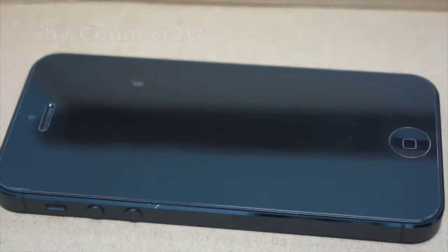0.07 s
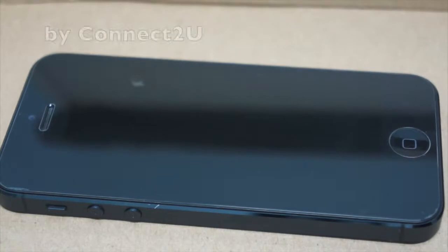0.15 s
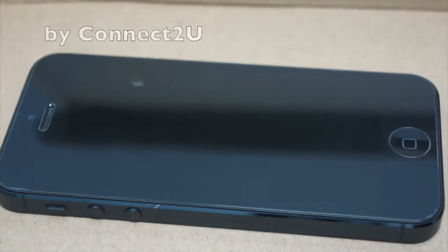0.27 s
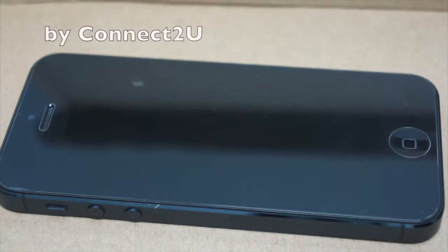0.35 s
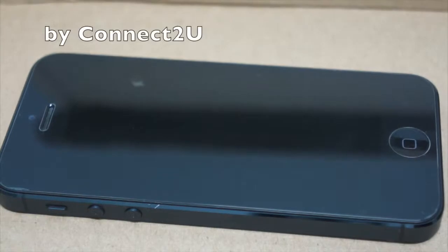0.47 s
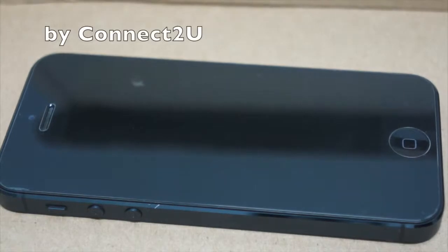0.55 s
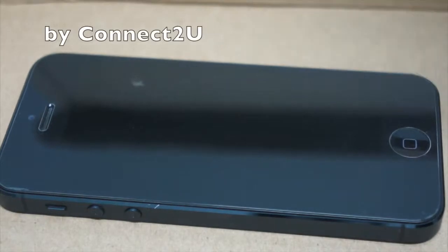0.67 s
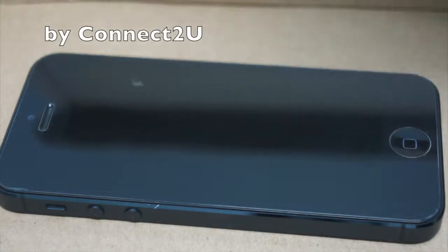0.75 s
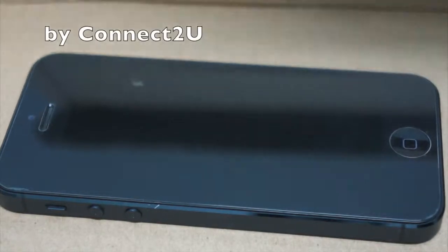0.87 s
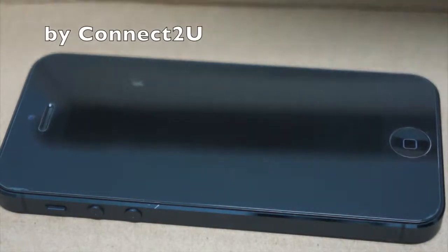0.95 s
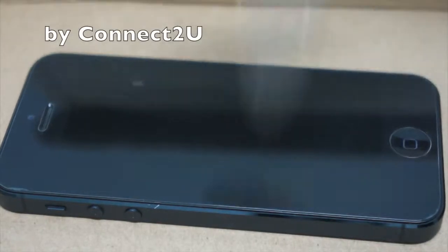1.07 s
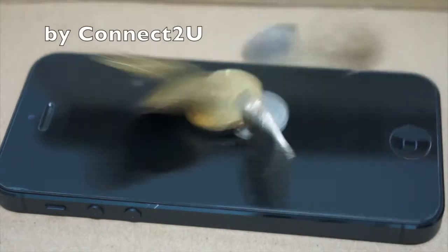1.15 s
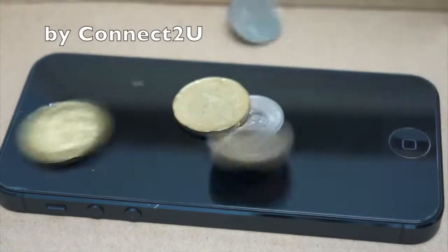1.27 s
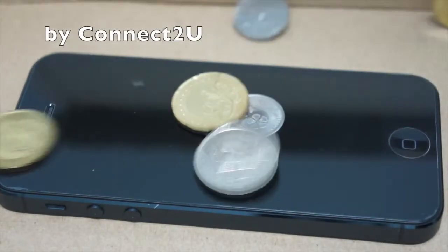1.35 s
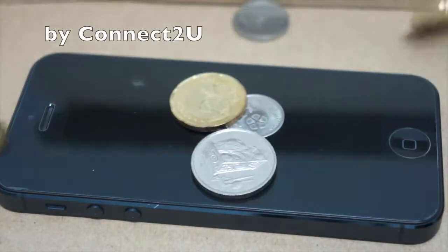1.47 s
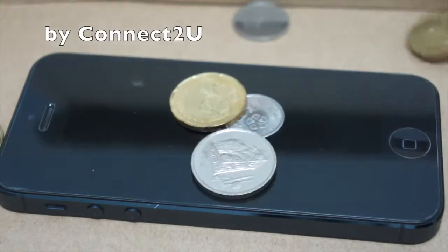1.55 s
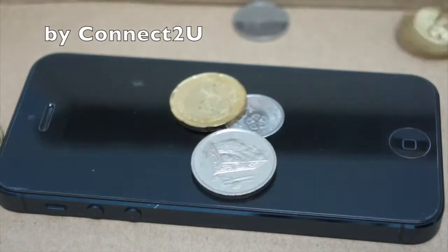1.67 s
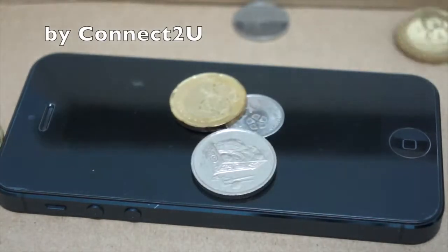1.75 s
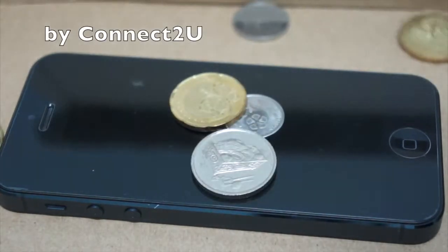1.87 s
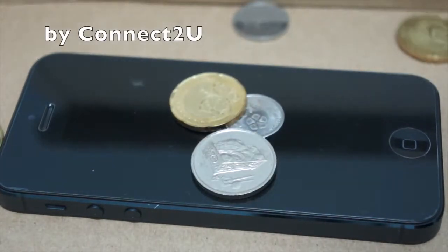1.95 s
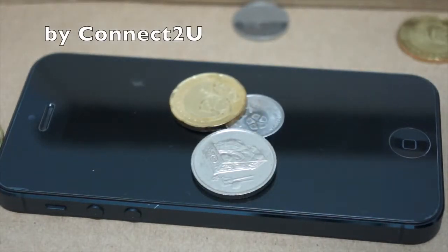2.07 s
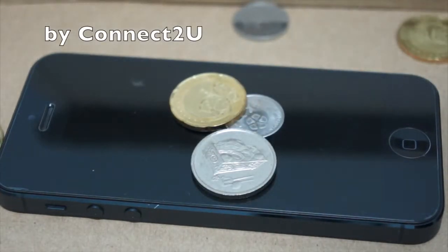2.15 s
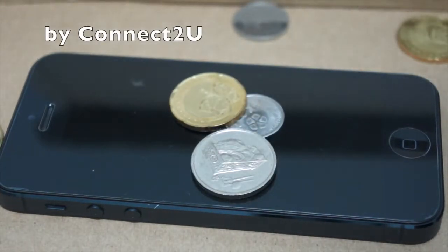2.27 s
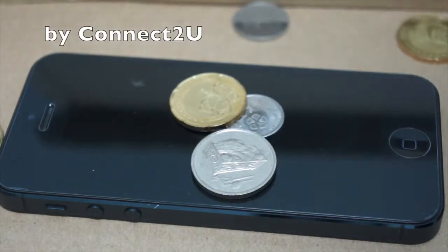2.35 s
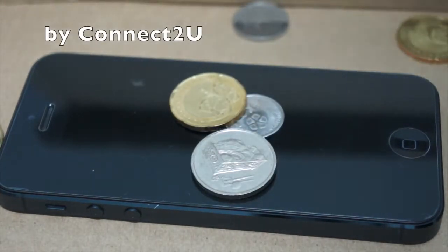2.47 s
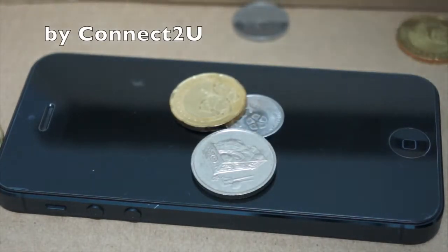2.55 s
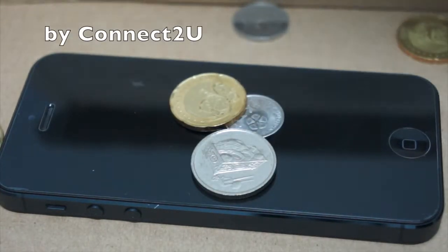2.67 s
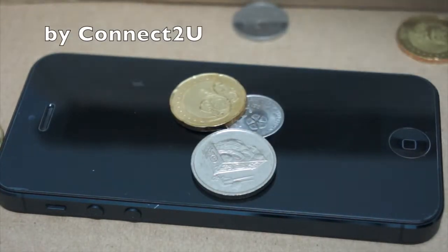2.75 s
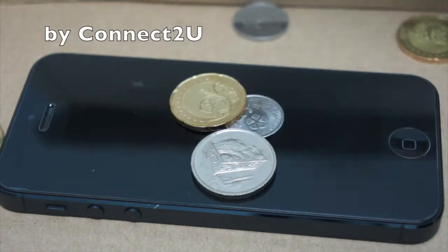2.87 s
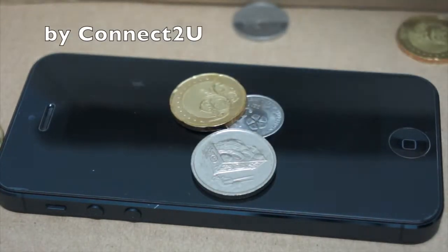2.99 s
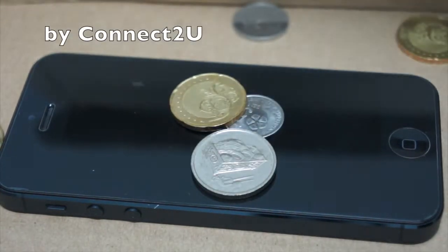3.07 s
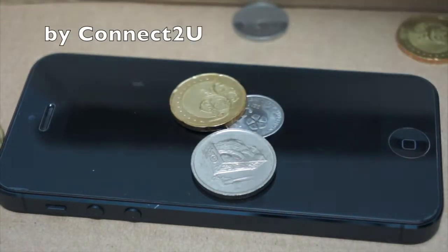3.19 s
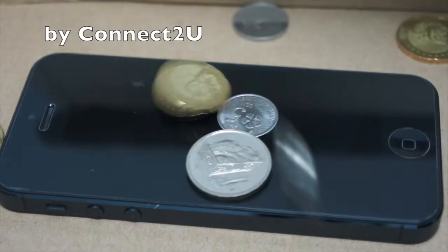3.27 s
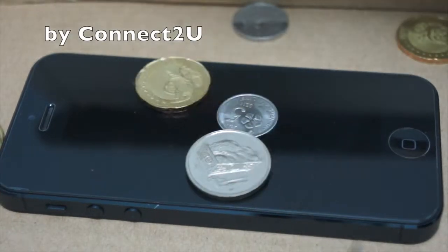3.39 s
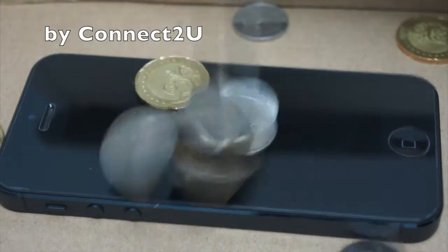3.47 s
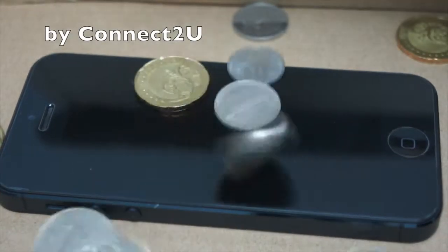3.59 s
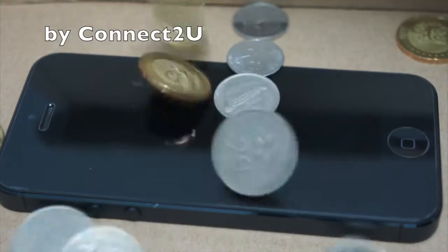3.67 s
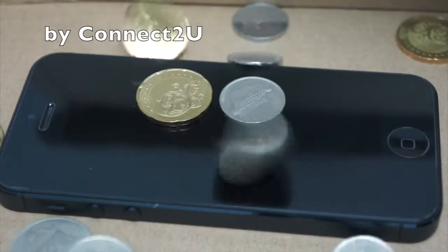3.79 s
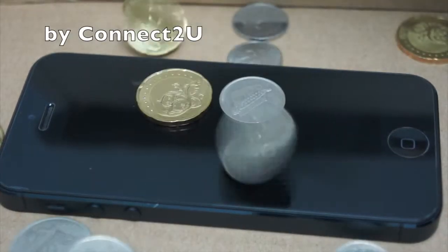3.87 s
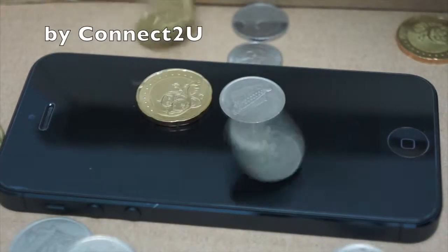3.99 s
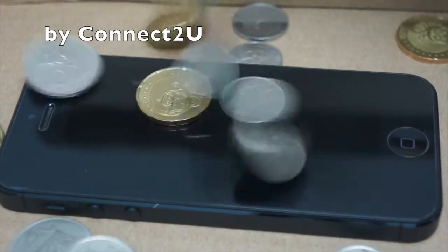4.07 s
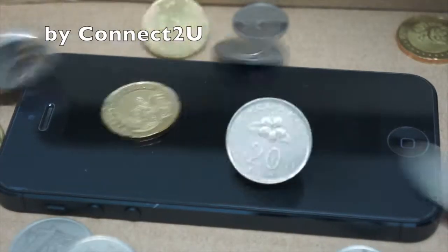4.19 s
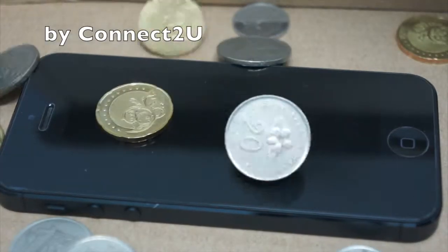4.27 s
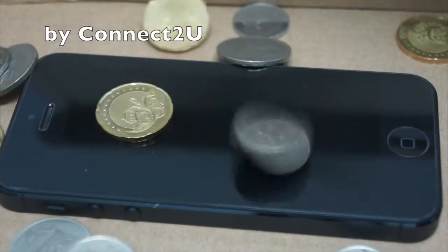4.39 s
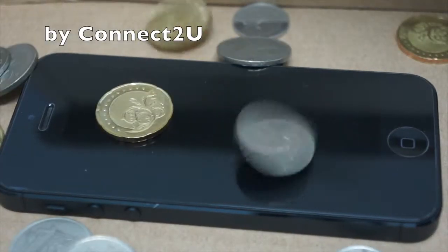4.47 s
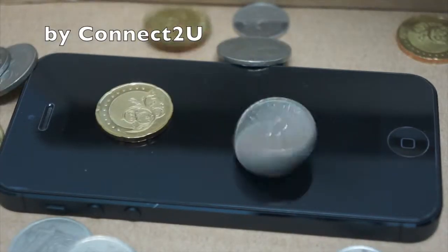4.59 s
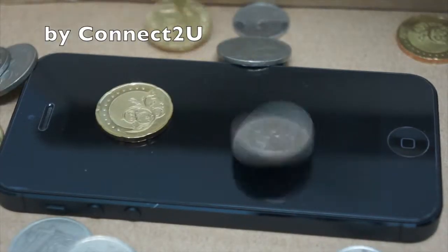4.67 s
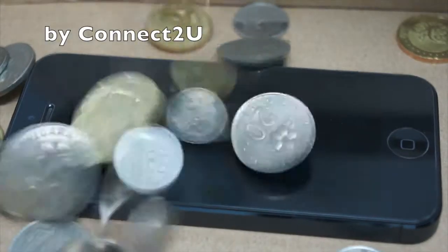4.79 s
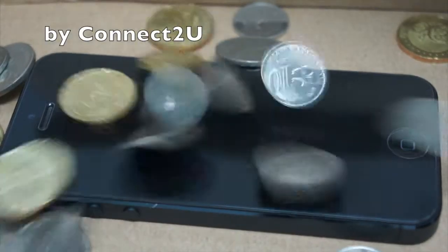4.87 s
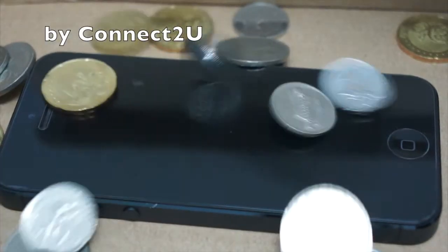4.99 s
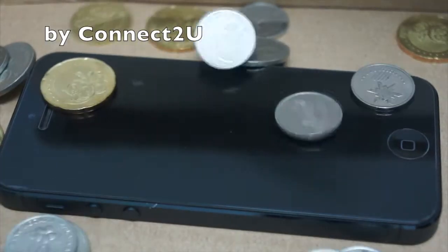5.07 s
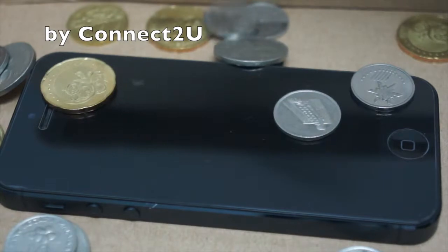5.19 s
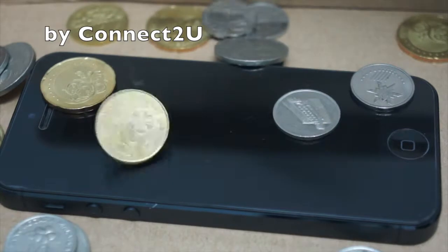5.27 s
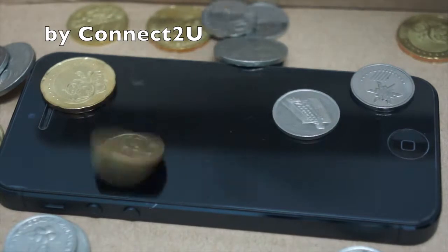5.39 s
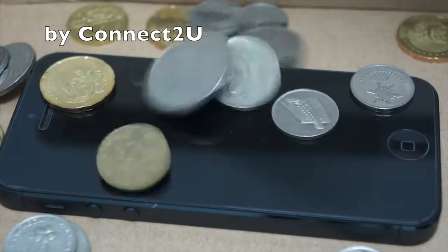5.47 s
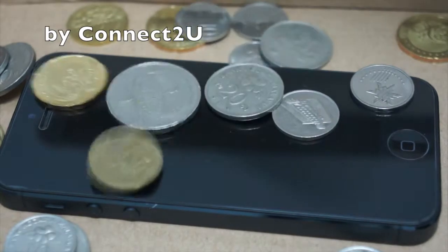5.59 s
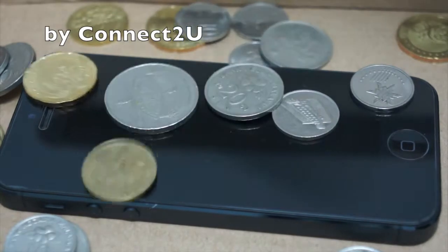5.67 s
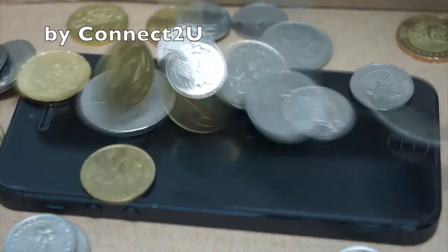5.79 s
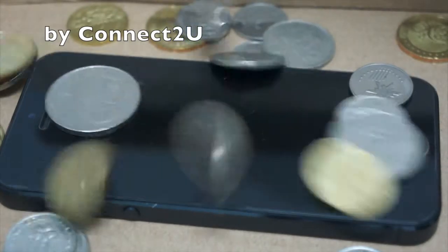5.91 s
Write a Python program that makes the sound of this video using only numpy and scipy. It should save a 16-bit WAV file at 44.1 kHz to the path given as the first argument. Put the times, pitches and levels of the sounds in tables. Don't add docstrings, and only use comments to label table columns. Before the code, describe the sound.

Sparse high clinks of coins shaken in a palm come first, over faint room tone. A dense burst of metal on glass follows, with dull taps from coins landing beside the phone. Sharp palm clinks return and thin out, then a second, longer shower rattles, skitters and rings. Close, bright, slightly limited camera sound with little reverb.

```python
import sys
import numpy as np
from scipy import signal
from scipy.fft import rfft, irfft, next_fast_len
from scipy.io import wavfile
from scipy.ndimage import uniform_filter1d, map_coordinates

SR = 44100
rng = np.random.default_rng(int(sys.argv[2]) if len(sys.argv) > 2 else 0)


def volts_from_db(level):
    exponent = np.asarray(level, float) / 20
    return 10 ** exponent


def unload_audio(sound):
    columns = np.transpose(np.atleast_2d(sound))
    steps = np.round(np.clip(columns, -1, 1) * 32767)
    wavfile.write(sys.argv[1], SR, steps.astype(np.int16))


N = 261954

# (time [s], level [dB])
AIR_LEVEL = [(.11, -45), (.72, -43.5), (.78, -47.5), (2.2, -58), (3.2, -54.5), (5.27, -59), (5.32, -82),
             (5.94, -82)]
# (frequency [Hz], density [dB])
AIR_SPECTRUM = [(25, -19), (100, 13), (300, 6.5), (650, -2), (1500, -8.5), (2200, -7.5), (4500, -19),
                (7000, -19), (10000, -9)]
# (frequency [Hz], gain [dB])
MIC_RESPONSE = [(60, -30.5), (150, -18.5), (400, -2.5), (1400, 3), (3000, 0.5), (5500, 2), (7500, -2),
                (10500, -2)]
# (frequency [Hz], t60 [s])
ROOM_DECAY = [(300, 0.1), (2000, 0.33), (10000, 0.17)]
# (frequency [Hz], likeness [0-1])
PORT_LIKENESS = [(200, 0.94), (700, 0.78), (1500, 0.41), (4000, 0), (9000, 0)]
# (time [s], tick [Hz], knock [Hz])
SLAB_LOAD = [(.11, 4780, 900), (1.13, 4750, 810), (1.16, 2890, 840), (1.57, 2216, 760), (2.05, 2590, 760),
             (2.24, 4710, 1193), (3.2, 4534, 1080), (3.43, 2564, 878), (3.8, 3065, 894), (4.3, 2278, 831),
             (4.65, 3930, 827), (4.85, 3246, 922), (5.15, 2997, 965), (5.7, 4100, 1160)]

COIN_MODE_HZ = [7995, 10793, 9050, 10110, 8829, 10589, 8064, 10995, 8549, 6880, 7337, 9749, 8646, 9189,
                10980, 9860, 8740]
# (time [s], peak level [dB])
FLIGHTS = [
    [(.122, -29), (.14, -37), (.207, -36), (.333, -35), (1.015, -48), (1.055, -60)],
    [(.772, -22), (.965, -31), (1, -44), (1.19, -22), (1.225, -22.5), (1.26, -34), (3.291, -25),
     (3.325, -22), (3.354, -39)],
    [(2.996, -46), (3.03, -50)],
    [(3.32, -18), (3.545, -26), (3.567, -20), (3.59, -16), (3.622, -16), (3.651, -16.5), (3.713, -14.5),
     (3.74, -21), (3.765, -28)],
    [(3.956, -36), (3.978, -40), (4.003, -25), (4.04, -38), (4.075, -35), (4.155, -20), (4.187, -10),
     (4.208, -22), (4.227, -19), (4.25, -29), (5.375, -36), (5.419, -47)],
    [(3.533, -29), (3.553, -17.5), (3.576, -24), (3.637, -22), (3.709, -24), (3.76, -22)],
    [(3.677, -41), (3.74, -29), (3.765, -25)],
    [(3.679, -25), (3.72, -24), (3.759, -24), (3.799, -22), (3.822, -26)],
    [(4.619, -20), (4.646, -26), (4.704, -20), (4.9, -25), (4.925, -33), (4.974, -27)],
    [(4.817, -33), (4.875, -36), (4.97, -38), (5.02, -36), (5.061, -34)],
    [(5.365, -46), (5.39, -35.5), (5.447, -45), (5.481, -30), (5.556, -18), (5.578, -48)],
    [(5.487, -17.5), (5.506, -13.5), (5.522, -21), (5.54, -24), (5.57, -24)],
    [(5.635, -23.5), (5.668, -27), (5.711, -32), (5.74, -35)],
    [(5.612, -24.5), (5.672, -29), (5.711, -29), (5.74, -34)],
    [(5.675, -36), (5.72, -44)],
    [(1.921, -13), (1.958, -13.5), (2.011, -26), (2.039, -17.5), (2.135, -20.5)],
    [(2.024, -24), (2.211, -21), (2.244, -18), (2.29, -19)],
]
# (time [s], frequency [Hz], peak level [dB])
BRIEF_FLASHES = [
    (1.48, 10800, -25.5),
    (1.776, 9300, -20),
    (1.83, 9250, -17),
    (2.251, 10570, -18),
    (2.274, 10500, -17),
    (2.32, 8310, -17.5),
    (.39, 4060, -49),
    (.42, 4020, -44),
    (.58, 2610, -45),
]

# (from [s], to [s])
SETTLING = (2.1, 2.34)
# (frequency [Hz], level [dB])
SETTLING_MODES = [
    (1160, -54),
    (2800, -49),
]

# (from [s], to [s], first level [dB], last level [dB], tick under the clink [dB])
PALM = [(0.09, 0.217, -26.5, -29, -15.5), (0.311, 0.379, -24, -48, -12), (0.386, 0.543, -44, -37.5, -1.5),
        (0.701, 0.74, -37, -20, -14), (0.884, 0.958, -46, -49, -8), (2.12, 2.302, -28.5, -24, -15),
        (2.422, 2.5, -13, -36.5, -20.5), (2.524, 2.6, -37, -48.5, -5.5), (2.599, 2.631, -46, -31, -4),
        (2.645, 2.773, -23, -59.5, -3), (2.756, 3.19, -52.5, -69, 1.5), (3.202, 3.25, -56, -41, 0)]
# (from [s], to [s], first level [dB], last level [dB])
POUR = [(1.141, 1.286, -18.5, -31), (1.324, 1.61, -34, -33.5), (1.588, 1.954, -25, -24),
        (1.908, 2.08, -18, -30.5), (3.267, 3.35, -29, -30), (3.371, 3.46, -20, -38.5),
        (3.5, 3.824, -23.5, -37.5), (3.783, 4.077, -25, -56), (4.107, 4.257, -22, -32.5),
        (4.232, 4.545, -47, -42), (4.549, 4.766, -21, -37), (4.771, 4.988, -25.5, -27),
        (4.97, 5.28, -27, -39), (5.278, 5.455, -30, -49), (5.459, 5.556, -23, -50),
        (5.566, 5.74, -30, -38.5), (5.755, 5.94, -29.5, -26)]
# (from [s], to [s], first level [dB], last level [dB], knock over the tick [dB])
SKITTER = [(1.154, 1.56, -25, -29.5, -1.5), (1.595, 2.012, -36.5, -32.5, 0.5),
           (3.273, 3.467, -28.5, -39, -6.5), (3.513, 3.9, -32, -28, -2.2), (3.91, 4.248, -30, -33.5, -6),
           (4.226, 4.442, -30.5, -35, -2.5), (4.455, 4.742, -34.5, -32.5, -2.5),
           (4.765, 4.928, -29, -35, -4), (4.919, 5.253, -29.5, -43, 0), (5.3, 5.44, -33, -49.5, -12),
           (5.458, 5.514, -27, -38, -6), (5.535, 5.695, -35, -39.5, -8.5), (5.77, 5.94, -35.5, -26.5, -5.5)]
# (from [s], to [s], first level [dB], last level [dB])
ROLL = [
    (1.16, 1.5, -49, -48.5),
    (1.54, 2.08, -47, -57),
    (3.39, 3.47, -42, -48.5),
    (3.5, 3.79, -56.5, -41.5),
    (3.79, 4.08, -41, -69),
    (4.22, 4.5, -52, -64),
    (4.5, 5.29, -66, -69.5),
    (5.46, 5.6, -62, -76),
    (5.76, 5.84, -71, -82),
]

# (centre [Hz], log spread, t60 [s])
CRACK = (6460, 0.421, 0.013)
# (log spread, t60 [s])
THUD = (.28, .06)

# (time [s], peak level [dB], tick level [dB])
PALM_CLINKS = [(0.117, -25, -37), (0.16, -25, -24), (0.1732, -24, -29), (0.186, -21, -34),
               (0.3125, -17.5, -62), (0.4361, -4.5, -25), (0.5696, -11.5, -46), (0.5789, -25, -35),
               (0.7135, -25, -45), (0.7247, -13.5, -48), (0.7444, -12, -45), (0.7642, -14.5, -34),
               (0.909, -22, -52), (0.9238, -21, -47), (0.933, -36, -48), (0.942, -37, -45),
               (0.951, -29, -50), (1.079, -40, -67), (0.9576, -17.5, -60),
               (2.132, -13, -42), (2.209, -10, -30.5), (2.24, -5, -52), (2.27, -24, -52), (2.295, -6, -49),
                (2.3272, -4.5, -29.5), (2.384, -19, -41.5), (2.4307, -17, -27), (2.4759, -12.5, -37),
                (2.5533, -21, -52), (2.6625, -15, -34), (2.7944, -38, -32.5), (2.874, -37, -43),
                (2.975, -37, -49), (2.99, -31, -48), (3.111, -30.5, -43), (3.1922, -33, -44),
               (1.129, -33, -50),
    (3.242, -25, -41),
]
# (time [s], glass tick level [dB],
# slab knock level [dB], coin clink level [dB])
SHOWER_LANDINGS = [(1.1485, -19.5, -35, -23), (1.1592, -25, -37, -22), (1.165, -26, -23, -14),
                   (1.1724, -16, -24, -25), (1.1839, -27, -36, -21), (1.1932, -18, -24, -15),
                   (1.2272, -19.0, -30, -14), (1.2527, -16, -33, -22), (1.2751, -26, -20, -20.5),
                   (1.2822, -26, -19.5, -38), (1.2897, -20, -26, -35), (1.2955, -11.5, -12, -29),
                   (1.3082, -26, -31, -18), (1.3496, -14, -42, -24), (1.3604, -37, -6, -28.0),
                   (1.3653, -14, -24, -27), (1.3766, -17, -25, -11), (1.3872, -37, -40, -35),
                   (1.4059, -43, -37, -12), (1.4165, -20, -14.5, -8.5), (1.4474, -39, -31, -16),
                   (1.4645, -20, -14, -32), (1.4883, -21, -38, -35), (1.4933, -21.5, -35, -31),
                   (1.5102, -31, -8, -18), (1.5239, -12.5, -19, -43), (1.5309, -11, -27, -38),
                   (1.557, -10, -20, -36), (1.5768, -10, -27, -21), (1.6361, -18, -26.5, -18),
                   (1.7313, -46, -40, -24), (1.7699, -54, -32, -24), (1.7988, -20.5, -21, -36),
                   (1.8346, -48, -29, -9), (1.8827, -26, -27, -12.5), (1.9026, -28, -36, -14),
                   (1.9224, -45, -42.5, -14), (1.9301, -60, -56, -9.5), (1.9564, -33, -43, -18),
                   (1.9731, -43, -44, -18), (1.9908, -20.5, -17.5, -38), (2.0108, -45, -32, -20),
                   (2.0194, -35, -25, -34), (2.035, -42, -28, -15), (2.0443, -34, -40, -31),
                   (2.0614, -47, -57, -16),
                   (3.2535, -45, -51, -31), (3.2591, -20, -19, -12.5), (3.2978, -32, -25, -11),
                 (3.322, -52, -30, -11), (3.3322, -18.5, -28, -15.5), (3.347, -38, -37, -24.0),
                 (3.3724, -23, -49, -28), (3.3885, -34, -43, -22), (3.3988, -23, -46, -16),
                 (3.4157, -31, -48, -13), (3.4328, -12, -24, -26), (3.4672, -31, -39.0, -14.5),
                 (3.5019, -16, -16, -12.5), (3.5077, -23, -37, -10), (3.5193, -33, -45, -20.0),
                 (3.5262, -23.5, -45, -16), (3.5644, -22, -40, -23), (3.5796, -28.0, -21.5, -25),
                 (3.5883, -20, -26, -21), (3.5972, -26, -18, -10), (3.6109, -20, -24, -22),
                 (3.6482, -14.5, -20, -27), (3.6753, -15.5, -40, -9), (3.6802, -19, -10.5, -10.5),
                 (3.7087, -34, -27, -24), (3.7262, -42, -35.0, -24), (3.731, -42, -44, -27),
                 (3.7386, -37, -19.5, -15), (3.7513, -27, -35.0, -31.0), (3.7585, -14, -25, -11.5),
                 (3.7945, -11, -17, -35), (3.8032, -12, -15, -21), (3.8188, -12, -45, -17),
                 (3.8273, -21, -16.5, -23), (3.8582, -49, -37, -10.5), (3.9008, -12, -11.5, -22.5),
                 (3.9129, -25, -37, -37), (3.9283, -15, -29, -26), (3.94, -34, -32, -47.0),
                 (4.0429, -29.5, -24.5, -29),
                   (4.088, -14, -30, -9), (4.0942, -24, -24, -6.5), (4.1054, -36, -47.0, -30),
                (4.113, -21, -22, -15), (4.1422, -20, -25, -12), (4.238, -11.5, -23, -24),
                (4.249, -15, -25, -36), (4.2845, -12, -28, -32), (4.2782, -8.5, -16, -20),
                (4.2912, -14, -36, -30), (4.3688, -20, -22, -25.5), (4.4774, -35, -31, -26),
                (4.502, -35, -35, -24), (4.5438, -43, -38.0, -19), (4.5637, -26, -31, -24),
                (4.6048, -35, -31, -10), (4.6126, -35, -45, -6), (4.6677, -45, -35, -27),
                (4.6891, -45, -45, -35), (4.6995, -46, -31, -15), (4.7084, -44, -47, -5.5),
                (4.7743, -14.5, -24.5, -13), (4.783, -16.5, -30, -24), (4.799, -21, -21.5, -19),
                (4.806, -16, -31, -11.5), (4.8272, -29, -23.5, -14), (4.8336, -18, -24, -13),
                (4.8427, -12.5, -27, -15), (4.85, -20, -28.0, -16), (4.8572, -21, -34, -8.5),
                (4.8653, -29, -27, -12), (4.87, -28, -36, -10), (4.891, -34, -40, -15),
                (4.8974, -22, -34, -11),
                   (4.9333, -10, -17.5, -16), (4.9529, -18, -36, -23), (4.959, -18, -26, -31),
              (4.9738, -17, -31, -29), (4.9892, -26, -33, -9.5), (4.997, -44, -30, -20),
              (5.0161, -16.5, -37, -20), (5.0227, -17, -33, -32), (5.0299, -25, -23.5, -33),
              (5.0378, -18, -37, -25), (5.0442, -25, -31, -18), (5.052, -25, -32, -23),
              (5.1072, -19, -26, -17.5), (5.129, -24.5, -23, -19), (5.1383, -22, -36, -31),
              (5.173, -21.5, -40, -39), (5.188, -27, -57, -48), (5.2818, -17, -25, -13),
              (5.2877, -25, -26, -17), (5.4618, -15.5, -22.5, -16), (5.469, -28, -36, -15.0),
              (5.4781, -30, -24, -4.5), (5.5311, -21, -31, -25), (5.548, -44, -49, -18),
              (5.5526, -24.5, -37, -7.5), (5.5661, -39, -33, -25), (5.606, -38, -44, -18),
              (5.7581, -24.5, -22.5, -10), (5.7693, -46, -49, -15), (5.8045, -21.5, -26, -13.5),
              (5.8364, -27, -30, -9), (5.8416, -21.5, -24, -17), (5.8728, -22, -33, -13),
              (5.8805, -19, -30, -22), (5.893, -33, -38, -15), (5.9092, -29, -36, -23)]
# (time [s], peak level [dB], frequency [Hz])
FLAT_LANDINGS = [(1.174, -14.5, 900), (1.2435, -9.5, 793), (1.472, -11, 847), (1.563, -13.5, 901),
                 (3.685, -11, 876), (3.808, -17, 896), (3.89, -23, 850), (4.937, -27, 996),
                 (1.635, -18.5, 755), (1.715, -17.5, 748), (1.782, -18, 810), (1.859, -18, 820),
                 (1.946, -25, 810), (1.988, -26, 670), (2.021, -19, 676), (3.395, -15.5, 858),
                 (5.236, -21, 665)]

TOP_HZ = 11050
CLINK_HZ = 9078


def unit(x):
    return x / np.sqrt(np.mean(x ** 2) + 1e-20)


def along(points, hz):
    f, v = np.transpose(points)
    return np.interp(np.log(hz + 1), np.log(f + 1), v)


def curves(rows):
    s, *cols = np.transpose(rows)
    return [np.interp(np.arange(N) / SR, s, c) for c in cols]


def filtered(x, response):
    m = next_fast_len(N + SR // 2)
    return irfft(rfft(x, m) * response(np.fft.rfftfreq(m, 1 / SR)), m)[..., :N]


def evened(x):
    return x / np.sqrt(np.abs(uniform_filter1d(np.mean(x ** 2, 0), SR // 12)) + 1e-9)


def bursts(rows, shift_db=0):
    attack_s, release_db_per_s = 0.005, 272
    t, power = np.arange(N) / SR, np.full(N, 1e-12)
    for (start, end, first_db, last_db, *_), extra_db in zip(rows, np.broadcast_to(shift_db, len(rows))):
        db = np.interp(t, [start, end], [first_db, last_db])
        db = db - release_db_per_s * np.maximum(t - end, 0)
        rise = np.clip((t - start) / attack_s, 0, 1)
        power += (volts_from_db(db + extra_db) * rise) ** 2
    return np.sqrt(power)


def contacts(times, gains, centre_hz, modes, count, rise_s=0.00015):
    spread, t60 = modes
    size = int(min(t60, 0.04) * SR)
    draw = rng.standard_normal((len(times), 2 * count + 2))
    hz = np.reshape(centre_hz, (-1, 1)) * np.exp(spread * draw[:, :count])
    hz = np.abs(TOP_HZ - np.abs(TOP_HZ - hz))
    share = volts_from_db(0.51 * draw[:, count:-2])
    share /= np.linalg.norm(share, axis=1, keepdims=True)
    life = t60 * volts_from_db(1.6 * draw[:, -2:-1])
    at = (times * SR).astype(int)[:, None] + np.arange(size)
    out = []
    for side in (-0.5, 0.5):
        delay = 0.0001 - side * 2.5e-5 * (0.5 + draw[:, -1:])
        t = np.maximum(np.arange(size) / SR - delay, 0)
        shape = gains[:, None] * volts_from_db(-60 * t / life) * (1 - np.exp(-t / rise_s))
        ring = sum(share[:, [k]] * np.sin(2 * np.pi * hz[:, [k]] * t + k * k) for k in range(count))
        out.append(np.bincount(at.ravel(), (shape * ring).ravel(), N + SR)[:N])
    return np.array(out)


def slab_modes(times):
    return [hz[(times * SR).astype(int)] for hz in curves(SLAB_LOAD)]


def air():
    shared, own = rng.standard_normal(N), rng.standard_normal((2, N))
    noise = filtered(shared + 0.5 * own, lambda hz: volts_from_db(along(AIR_SPECTRUM, hz)))
    return volts_from_db(curves(AIR_LEVEL)[0]) * unit(noise)


def room(x):
    delay, block = 130, SR // 4
    out = np.zeros((2, N + SR))
    for at in range(0, N, block):
        hz, t, z = signal.stft(rng.standard_normal((2, SR // 2)), SR, nperseg=256)
        turn = np.arccos(np.clip(along(PORT_LIKENESS, hz), 0, 1))[:, None] / 2
        mid, side = z[0] * np.cos(turn), z[1] * np.sin(turn)
        decay = volts_from_db(-60 * t / along(ROOM_DECAY, hz)[:, None])
        tail = signal.istft(np.array([mid + side, mid - side]) * decay, SR, nperseg=256)[1]
        wet = signal.fftconvolve(x[:, at:at + block], tail / np.linalg.norm(tail[0]), axes=1)
        out[:, at + delay:at + delay + wet.shape[1]] += wet
    return out[:, :N]


def wobble():
    times = np.linspace(*SETTLING, 60) + rng.normal(0, 0.001, 60)
    out = np.zeros((2, N))
    for hz, db in SETTLING_MODES:
        gains = volts_from_db(db - 3.0 + rng.normal(0, 6.3, len(times)))
        out += contacts(times, gains, hz, (0.025, 0.035), count=2)
    return out


def rings():
    turn_s = 0.0088
    crowd_from_s, crowd_to_s, crowd_rough = 1.7, 2.4, 1.2
    t, out = np.arange(N) / SR, np.zeros((2, N))
    drift = 0.9 * map_coordinates(rng.standard_normal(500), [t * 55])
    knots = rng.standard_normal((2, 2000))
    flutter_db = np.array([map_coordinates(k, [t * 300]) for k in knots])
    jolts = ((t > crowd_from_s) & (t < crowd_to_s)) * np.sum(flutter_db, 0)
    drift = drift + crowd_rough * np.roll(jolts, 900)
    flutter_db = flutter_db + 2 * jolts - 3 * np.abs(np.sign(jolts))
    flashes = BRIEF_FLASHES + [(s, hz, db) for hz, turns in zip(COIN_MODE_HZ, FLIGHTS) for s, db in turns]
    for s, hz, db in flashes:
        near = slice(int((s - 0.05) * SR), int((s + 0.05) * SR))
        swell = volts_from_db(db) * np.exp(-0.5 * ((t[near] - s) / turn_s) ** 2)
        phase = 2 * np.pi * hz * t[near] + drift[near] + [[0], [0.4]]
        out[:, near] += swell * np.sin(phase)
    return out * volts_from_db(flutter_db)


def rattle():
    clink_modes, tick_modes, knock_modes = (0.132, 0.0089), (0.372, 0.036), (0.19, 0.014)
    times, luck = rng.uniform((0, 0), (N / SR, 1), (3600, 2)).T
    sizes = volts_from_db(-3.2 * np.log(luck + 0.02))
    tick_hz, knock_hz = slab_modes(times)
    coins = bursts(PALM + POUR)
    glass = np.hypot(bursts(PALM, [row[-1] for row in PALM]), bursts(SKITTER))
    slab = bursts(SKITTER, [row[-1] for row in SKITTER])
    clink = evened(contacts(times, sizes, CLINK_HZ, clink_modes, count=3))
    tick = evened(contacts(times, sizes, tick_hz, tick_modes, count=4))
    crack = evened(contacts(times, sizes, CRACK[0], CRACK[1:], count=4))
    few = slice(0, None, 4)
    knock = evened(contacts(times[few], sizes[few], knock_hz[few], knock_modes, count=2))
    thud = evened(contacts(times[few], sizes[few], 301, THUD, count=3))
    out = volts_from_db(-1.5) * coins * clink
    out += volts_from_db(-8.0) * glass * tick
    out += volts_from_db(-8.5) * np.sqrt(coins * glass) * crack
    out += volts_from_db(-4.0) * slab * knock
    out += volts_from_db(9.0) * bursts(ROLL) * thud
    return out


def flat_landings():
    times, peak_db, hz = np.transpose(FLAT_LANDINGS)
    return contacts(times, volts_from_db(peak_db - 0.5), hz, (0.15, 0.045), count=6, rise_s=0.00087)


def slab_blows(landings):
    times, glass_db, knock_db, coin_db = landings.T
    tick_hz, knock_hz = slab_modes(times)
    knock = contacts(times, volts_from_db(knock_db + 6.5), knock_hz, (0.17, 0.02), count=6, rise_s=0.00074)
    slap = contacts(times, volts_from_db((glass_db + coin_db) / 2 + 8), 4726, (0.6, 0.0035), count=16)
    sheet_hz = np.where(tick_hz > 2600, 3150, 2050)
    sheet = contacts(times, volts_from_db(glass_db - 6.0), sheet_hz, (0.05, 0.03), count=3, rise_s=0.0017)
    return knock + slap + sheet


def hits():
    palm = [(s, tick + 6.5, clink) for s, clink, tick in PALM_CLINKS]
    landings = np.array(SHOWER_LANDINGS)
    glass = [(s, tick + 2.5, clink + 3) for s, tick, knock, clink in landings]
    times, tick_db, clink_db = np.transpose(palm + glass)
    tick_hz = slab_modes(times)[0]
    clink = contacts(times, volts_from_db(clink_db + 3.5), CLINK_HZ, (0.14, 0.011), count=14, rise_s=0.0004)
    tick = contacts(times, volts_from_db(tick_db - 1.0), tick_hz, (0.27, 0.013), count=14, rise_s=0.00049)
    crack = contacts(times, volts_from_db((clink_db + tick_db) / 2 + 0.5), CRACK[0], (0.5, 0.004), count=14)
    return clink + tick + crack + slab_blows(landings) + flat_landings()


def scene():
    small, blows, tones = rattle() + wobble(), hits(), rings()
    wet = room(volts_from_db(-1.5) * small + volts_from_db(-6.0) * blows + volts_from_db(-24) * tones)
    ports = volts_from_db([[0.6], [-0.6]])
    return (small + blows + tones + wet) * ports + air()


def roll_off(x):
    return signal.sosfilt(signal.butter(12, 12300, fs=SR, output="sos"), x)


def record(dry):
    peak, start_s = 0.5, 0.108
    x = filtered(dry, lambda hz: volts_from_db(along(MIC_RESPONSE, hz)))
    x = x / (1 + np.abs(x / peak) ** 4) ** (1 / 4)
    x = filtered(x, lambda hz: (1 / (1 + (hz / TOP_HZ) ** 200) + volts_from_db(-62)) * hz / (hz + 120))
    fade_in = np.clip((np.arange(N) / SR - start_s) / 0.015, 0, 1)
    fade_out = np.clip((N - np.arange(N)) / 130, 0, 1)
    return roll_off(x * fade_in * fade_out)


dry = scene()
out = record(dry)
unload_audio(out)
```